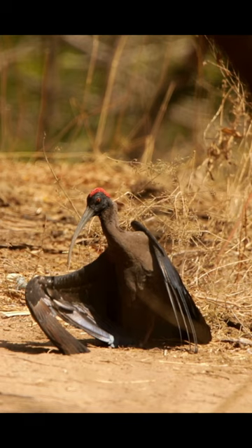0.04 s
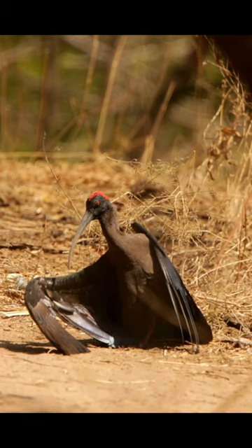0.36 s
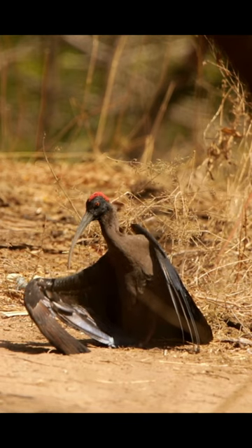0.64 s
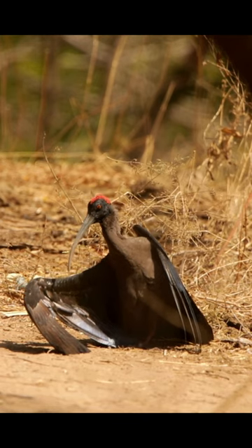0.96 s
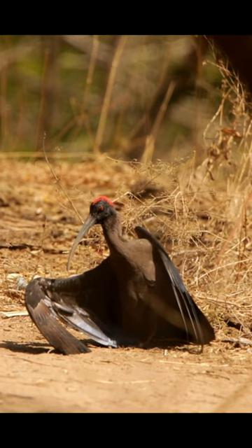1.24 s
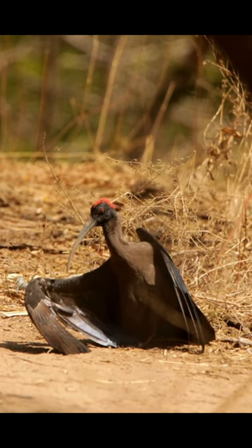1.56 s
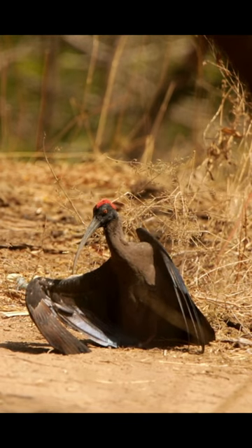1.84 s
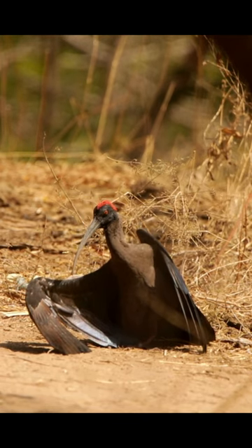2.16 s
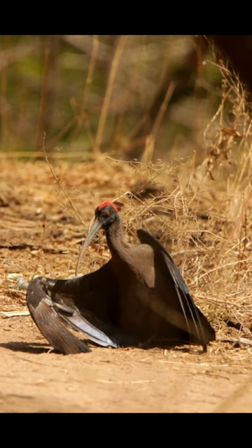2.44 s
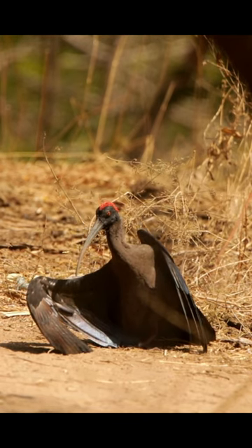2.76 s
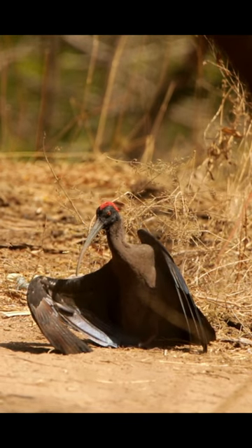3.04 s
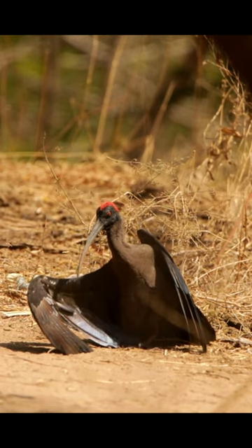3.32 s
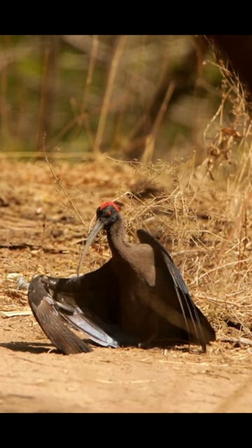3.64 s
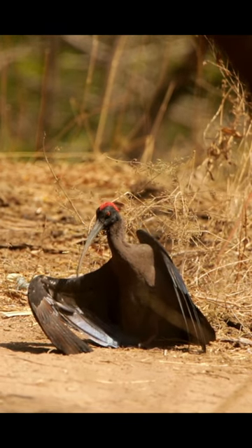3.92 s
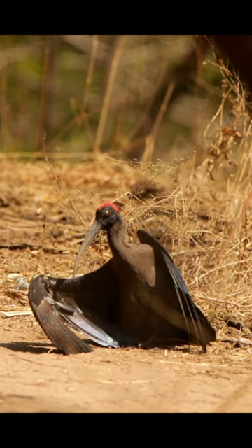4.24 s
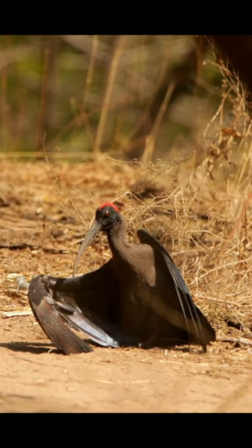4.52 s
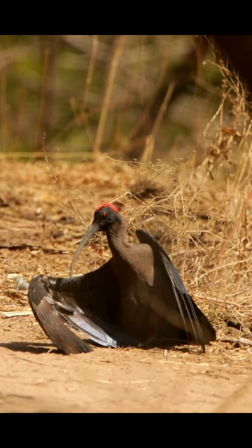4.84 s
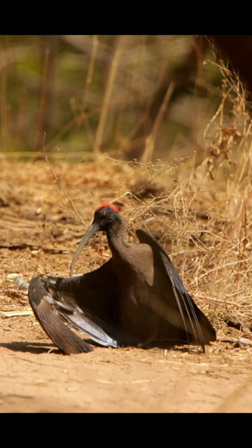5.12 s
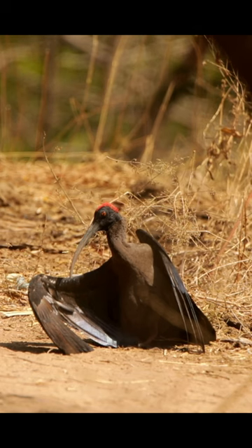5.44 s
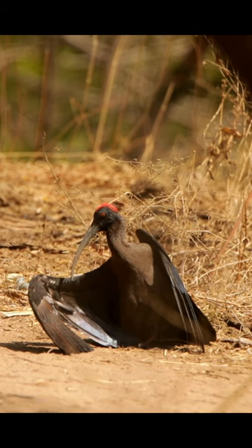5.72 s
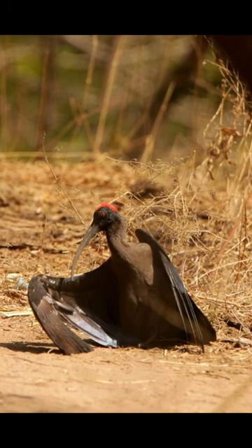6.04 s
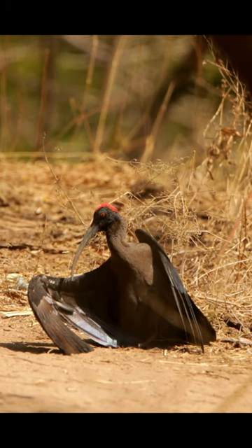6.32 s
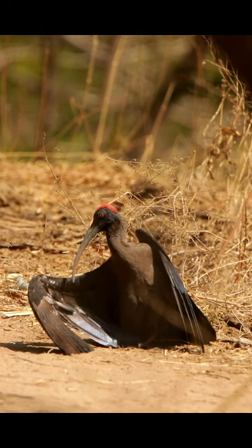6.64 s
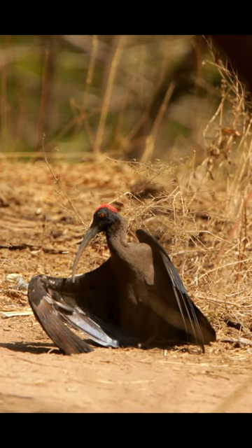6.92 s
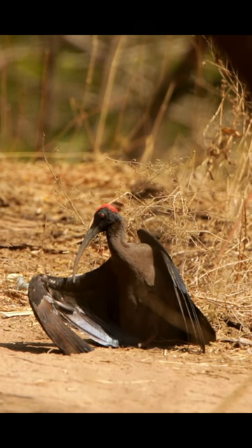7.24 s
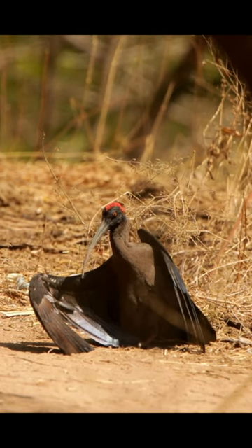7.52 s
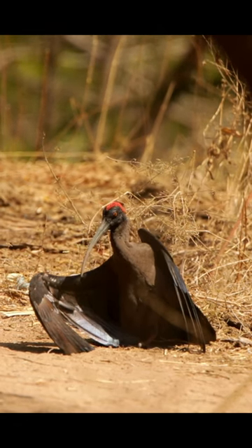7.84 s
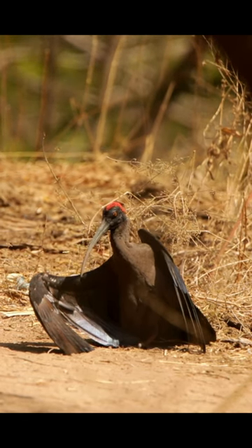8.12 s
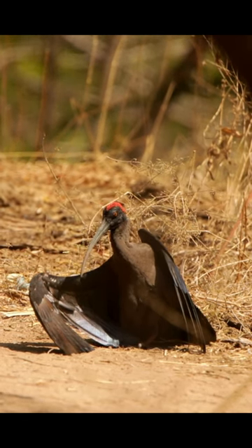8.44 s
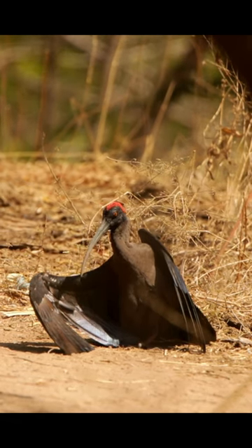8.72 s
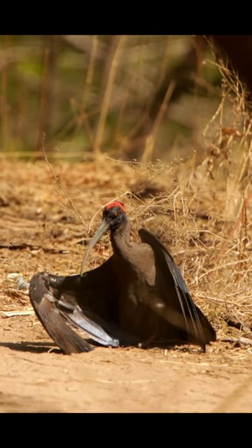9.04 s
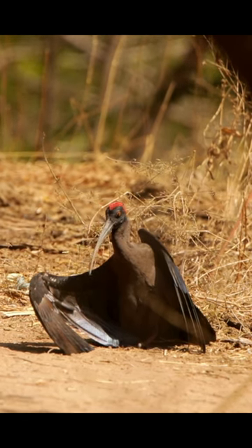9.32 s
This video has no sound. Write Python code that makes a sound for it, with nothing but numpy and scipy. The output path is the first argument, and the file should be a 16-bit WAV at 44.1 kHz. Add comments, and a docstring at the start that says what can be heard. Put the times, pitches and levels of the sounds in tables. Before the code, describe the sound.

Repeated harsh, trilling bird screeches ring out in dry scrub, with small whistles, a few ticks and a steady low background rush.

```python
"""A low outdoor rush opens, and at once birds screech and croak in dry scrub: two-voiced syrinx tones
shaken by a fast trill whose every second dip is deeper. Small birds add whistles throughout and thin
chips for the first 3 s; stalks and trees scatter every call. Two dull knocks land near 1.5 and 2 s,
and air puffs on the microphone from 2 to 5 s. The loudest screech cuts through just after 7 s,
dry grass snaps twice around 8 s, and a faint, rough croak closes the scene."""
import sys
import numpy as np
from scipy import signal
from scipy.fft import rfft, irfft, next_fast_len
from scipy.io import wavfile
from scipy.ndimage import uniform_filter1d, map_coordinates

SR = 44100
rng = np.random.default_rng(int(sys.argv[2]) if len(sys.argv) > 2 else 0)


def put_to_file(sound):
    """Save the sound as 16-bit audio at rate SR, in the file named by the first command-line argument."""
    columns = np.atleast_2d(sound).T  # one column per channel
    safe = np.clip(columns, -1, 1)
    whole_steps = np.round(safe * 32767)
    wavfile.write(sys.argv[1], SR, whole_steps.astype(np.int16))


N = 417627

# Screech cues: (time [s], length [s], attack [s], release [s], relative level [dB], lower voice [dB],
# overtones [dB], time to top pitch [s], top pitch [Hz], end pitch [Hz], trill swing [share],
# crest accent [dB], deep-dip accent [dB], roughness [0-1], pan to the left [dB])
SCREECHES = [ (0.212, 0.18, 0.081, 0.07, -39, -6.5, -12, 0.048, 4420, 4190, 0.035, -1, 0, .25, 2.5),
             (.27, .35, 0.074, 0.28, -36.5, -11.5, -19, 0.031, 3807, 2557, .05, -3, 4, .38, -1),
             (.905, 0.43, 0.1, .12, -31, -16, -13, 0.086, 3280, 2500, 0.085, 1.5, 4.5, 0.34, -3.5),
             (1.3, 0.2, 0.06, 0.12, -34, -6.5, -11, .06, 4045, 3770, 0.038, -3, 6, 0.4, 0),
             (1.391, 0.27, .09, 0.19, -33, -14, -19, 0.039, 2937, 2095, 0.064, 1.5, 2, 0.35, -3),
             (1.926, .41, .11, .1, -26, -10, -15, 0.11, 3480, 2740, 0.041, 0.5, 1, 0.31, -2),
             (2.339, 0.29, .1, 0.17, -37, -10, -22, .12, 4110, 3500, 0.11, 0, -4, 0.5, 1),
             (2.406, .33, 0.068, .18, -31, -5.5, -17, 0.081, 2940, 2603, .09, -4.5, 10, 0.21, -2),
             (2.729, 0.29, 0.028, 0.1, -39.5, -7, -9.5, 0.039, 3910, 2847, .11, -5, -2, 0.46, 0),
             (3.269, 0.52, 0.13, 0.14, -44.5, -10, -11, .12, 3310, 2795, .15, 0, 0, 0.92, 5),
             (3.77, 0.23, .1, 0.066, -41.5, -4.5, -14, 0.086, 3010, 2653, 0.17, 2, 0, .9, 2),
             (4.081, 0.29, 0.098, 0.069, -32, -10.5, -14, 0.11, 3516, 3140, 0.063, 2, -18, 0.47, -2),
             (4.3, .31, 0.086, 0.06, -28, -14.5, -15, 0.072, 3400, 2700, 0.084, 1, 1, .42, -3),
             (4.548, 0.43, 0.054, 0.41, -29.5, -8.5, -14, 0.076, 3566, 2590, 0.18, -4, 2, 0.67, -2),
             (4.904, 0.15, .09, .05, -28, -11.5, -15, .08, 4210, 3690, 0.059, 2, -6, 0.33, 1),
             (4.97, 0.24, .05, 0.15, -33.5, -5, -12.5, 0.043, 3804, 2890, .12, -3, 3, 0.67, -3),
             (5.644, 0.32, 0.17, .045, -27, -10.5, -16, 0.13, 3420, 2907, 0.036, 3.5, 2.5, 0.26, -1),
             (6.057, 0.21, 0.065, 0.077, -29.5, -7, -22.5, 0.11, 2903, 2750, 0.081, -.5, 14, 0.25, -1.5),
             (6.19, .42, 0.088, 0.29, -31.5, -9, -15, .1, 3695, 2392, .14, 2, -7, 0.56, -3),
             (6.901, 0.26, .07, 0.046, -36.5, -9, -30, 0.073, 3870, 3650, 0.11, -2, 2, 0.46, 0),
             (7.103, .2, 0.058, 0.12, -22.5, -11, -15.5, .095, 4844, 3780, .12, -3, 6.5, 0.21, 1),
             (7.283, 0.16, .03, .05, -42, 0, -11, 0.033, 3425, 2930, .12, 0, 0, .7, -3),
             (7.401, 0.37, 0.098, 0.13, -30, -20, -13.5, 0.078, 3427, 2660, 0.079, 2, 3, 0.26, -2),
             (7.808, 0.35, 0.047, 0.035, -36, -9, -35, 0.048, 2680, 2410, 0.066, -2, -15, 0.44, -3),
             (8.09, 0.35, 0.12, .04, -26.5, -12, -13.5, .12, 3535, 2800, .04, 4, 5, 0.24, -1),
             (8.507, .25, 0.044, 0.11, -31.5, -6.5, -24, 0.097, 3045, 2595, .08, 0.5, 14.5, 0.14, -1),
             (9.294, 0.2, .13, .03, -43, -17, -28, 0.064, 2690, 2880, 0.17, 4, 0, 0.83, -1), ]
# Tone curves of a screech, all (frequency [Hz], gain [dB])
THROAT_EQ = [(1000, -45), (1500, -5.5), (1850, 1.5), (4600, 2.5), (5600, 4.5), (7500, -22)]  # throat resonance on both voices
BEAK_EQ = [(1500, -40), (3800, -3), (4650, -2), (5250, 6.5), (6300, -0.5), (7300, 0.5), (8500, 1),
           (10300, -9.5), (12500, -25)]  # overtones that the beak lets out
SHRILL_EQ = [(6000, -46), (8000, -34), (9300, -7), (10200, -10), (10700, -12), (11500, -36)]  # resonance that the upper voice's octave sweeps through
NASAL_EQ = [(3900, -4), (4600, -5), (5200, 4.5), (5700, -1), (6300, -7)]  # beak resonance on the sum tone
RASP_EQ = [(3200, 2.5), (4200, 2), (4700, -0.5), (6500, -24)]  # band of rasp above the upper voice
# Whistle cues: (time [s], length [s], start [Hz], middle [Hz], end [Hz], relative level [dB])
WHISTLE_CUES = [ (0.642, 0.11, 3480, 3450, 3520, -37), (.72, 0.061, 3500, 4020, 4300, -37),
                (0.758, 0.044, 3700, 3300, 3150, -30.5), (.826, .03, 2900, 3290, 3730, -26.5),
                (1.765, 0.034, 3300, 4020, 4270, -32), (1.792, 0.037, 3700, 3300, 3100, -28),
                (1.855, 0.042, 2900, 3460, 2650, -25.5), (2.754, 0.023, 3700, 4270, 4380, -32),
                (2.834, 0.043, 3100, 3440, 3070, -29), (3.162, .04, 6430, 6400, 6450, -46),
                (3.466, 0.033, 3350, 3390, 3380, -32), (4.065, .035, 3000, 3050, 2980, -31),
                (5.561, .09, 3800, 3780, 3820, -40), (6.627, 0.03, 3750, 3390, 3250, -28.5),
                (6.691, 0.034, 3000, 3290, 3620, -24.5), (6.718, 0.047, 3100, 2880, 3010, -35),
                (6.79, 0.04, 2700, 2755, 2700, -31.5), (8.89, 0.042, 3340, 3370, 3460, -34), ]
# Thin falling chips: (time [s], start pitch [Hz], relative level [dB])
CHIP_CUES = [ (.056, 12400, -55), (.172, 12300, -55), (.296, 12000, -47), (.314, 10900, -51),
             (.655, 12900, -55), (1.831, 11400, -48), (2.432, 11500, -53), (2.484, 10900, -49),
             (2.538, 12100, -50), (2.557, 10900, -45), (2.663, 12700, -51), (2.674, 8600, -43),
             (2.688, 11700, -47), (2.707, 11300, -46), (2.822, 8600, -48), (2.833, 11900, -45),
             (2.856, 11100, -47), ]
# Dry grass snaps and soft knocks: (time [s], relative level [dB])
SNAP_CUES = [(0.0593, -40), (7.9882, -33), (8.1702, -26)]
KNOCK_CUES = [(1.47, -34), (2.08, -33)]
# Puffs of air on the microphone: (time [s], half length [s], relative level [dB])
PUFF_CUES = [(2.08, 0.043, -48), (2.243, 0.045, -49), (2.39, 0.057, -54), (4.15, 0.054, -59),
             (5.11, .06, -59)]
# Colours of the noise layers: (frequency [Hz], gain [dB])
SNAP_EQ = [(2000, -22), (6000, -3), (9500, 3), (12500, -17), (15000, -25)]
KNOCK_EQ = [(150, -22), (330, -15), (450, 3), (560, -9), (720, 4.5), (1300, -24), (4000, -70)]
SCRUB_EQ = [(2000, 0), (4500, 1), (8000, 9)]
PUFF_EQ = [(12, -20), (25, -8), (48, 0), (75, -18), (130, -60), (600, -120)]
RUSH_EQ = [(22, -47), (38, -13.5), (118, -10.5), (264, -14), (291, -13.5), (384, -10), (620, -4), (758, -1),
           (2070, -7.5), (3260, -5.5), (3600, -9.5), (3990, -9), (5260, -16), (8270, -19.5), (15500, -40)]
# Stereo image of the rush: (frequency [Hz], left-right correlation [-1 to 1])
RUSH_CORRELATION = [(60, 0.964), (130, 1), (290, 0.78), (640, 0.76), (1410, 0.41), (3100, 0.41),
                    (6820, -0.071), (15000, -0.0041)]
# Reverb tail of the trees: (frequency [Hz], time to fall 60 dB [s])
TREE_DECAY = [(500, 1), (3000, 0.82), (6000, 0.51), (11000, 0.083)]


def screech(row, trill_hz=78.65, throat_hz=2520, plunge_hz=950, rasp_ratio=1.24):
    """One harsh call: both sides of the syrinx sound together under one trill."""
    length, attack, release, level_db, lower_db, overtone_db = row[:6]
    top_s, top_hz, end_hz, swing, crest_db, accent_db, rough = row[6:]
    t = np.arange(0, length, 1 / SR)
    n = len(t)
    effort_db, pitch, gape_db = gesture(t, length, attack, release, top_s, top_hz, end_hz)
    past_middle = t / length - .5
    rough = np.clip(rough * (1 - .47 * past_middle), 0, 1)  # the call clears as it goes
    trill = phase(trill_hz * (1 + .012 * wobble(40, n)))
    crest = -np.cos(trill + .6 * wobble(150, n))
    # period doubling: every second dip plunges toward the throat resonance and pops there
    dip = np.cos(trill / 4) ** 24
    bottom_hz = np.clip(throat_hz, pitch - plunge_hz, .95 * pitch)
    pop_db = accent_db + 6 * past_middle
    accent = amp(crest_db * crest + pop_db * dip ** 3 - 10 * dip * (1 - dip) + 1.8 * wobble(170, n))
    upper_hz = (1 - dip) * pitch * (1 + swing * (crest - .5)) + dip * bottom_hz
    lower_hz = 1990 * (pitch / 3100) ** .35
    upper = phase(upper_hz * (1 + .0496 * rough * wobble(900, n)))
    lower = phase(lower_hz * (1 - .08 * np.sin(trill) + .0718 * wobble(900, n)))
    # chaotic flutter of the membranes spreads the tone into a band
    shake = lambda: wobble(1100, n) + .55 * wobble(3400, n)
    flutter = lambda angle: np.sin(angle) * shake() + np.cos(angle) * shake()
    upper_voice = unit((1 - rough) * unit(accent * np.sin(upper)) + (rough + .03) * flutter(upper))
    # the lower voice swells in the trill's shallow troughs and comes forward as effort drops
    lower_voice = unit(np.sin(lower) * amp(1.8 * wobble(245.4, n) - 1.1 * crest - 6.8 * dip))
    blend = np.clip(amp(lower_db - .66 * effort_db), 0, .8)
    body = coloured(np.sqrt(1 - blend ** 2) * upper_voice + blend * lower_voice, THROAT_EQ)
    # the two voices mix into sum tones, with turbulent hiss on top
    sum_tones = np.sin(2 * upper) + np.sin(2 * upper + lower) / 2
    overtones = unit(coloured(sum_tones + 4.6 * rng.standard_normal(n), BEAK_EQ))
    shrill = coloured(np.sin(2 * upper) * (1 + .62 * shake()), SHRILL_EQ)
    nasal = coloured(amp(-12) * np.sin(2 * lower) + amp(-15.5) * np.sin(upper + lower), NASAL_EQ)
    rasp = amp(-10.5) * coloured(unit(flutter(rasp_ratio * upper)), RASP_EQ)
    opening = amp(gape_db) * min(amp(overtone_db + 16.5), 1)
    voice = body + shrill + opening * (nasal + rasp) + amp(overtone_db + gape_db) * overtones
    fade = np.clip(np.minimum(t, length - t) / .015, 0, 1)
    return amp(level_db + effort_db) * fade * voice


def gesture(t, length, attack, release, top_s, top_hz, end_hz, ease=1.44, widest_at=.38):
    """Effort swells and dies; pitch scoops up and glides to its end; the beak opens and closes once."""
    ramp = lambda x: np.clip(x, 0, 1)
    effort_db = -9 * ramp(1 - t / attack) ** ease - 9.5 * ramp(1 - (length - t) / release) ** ease
    scoop_hz = top_hz * (1 - .12 * ramp(1 - t / top_s) ** 2)
    glide_hz = (end_hz - top_hz) * ramp((t - top_s) / (length - top_s)) ** 1.15
    gape_db = -4.5 * (2 * (t / length - widest_at)) ** 2
    return effort_db, scoop_hz + glide_hz, gape_db


def screeching_birds(right_lead_s=32e-6):
    """Each call is panned to its own place and reaches the right side first; reflections follow."""
    direct, reflected = np.zeros((2, N)), np.zeros((2, N))
    for start, *row, pan_db in SCREECHES:
        # rougher calls come from deeper in the scrub: less direct sound, more reflection
        rough = row[-1]
        call = amp(-2.5 * rough) * screech(row)
        wet = amp(10 * rough) * (amp(-12.5) * scrub(call) + amp(-12) * trees(call))
        for side, sign in enumerate((1, -1)):
            add(direct[side], start, amp(sign * pan_db / 2) * call)
            add(reflected[side], start, wet[side])
    lead_s = right_lead_s / 2 * np.array([[-1], [1]])
    return filtered(direct, lambda hz: np.exp(2j * np.pi * hz * lead_s)) + reflected


def whistles():
    """Small birds further off whistle gliding, slightly hoarse notes."""
    out = np.zeros(N)
    for start, length, *pitches, db in WHISTLE_CUES:
        u = np.linspace(0, 1, round(length * SR))
        glide_hz = np.polyval(np.polyfit([0, .5, 1], pitches, 2), u)
        tone = np.sin(phase(glide_hz * (1 + .01 * wobble(660, len(u)))))
        hoarse = 1 + .45 * wobble(1600, len(u))
        add(out, start, amp(db) * np.abs(np.sin(np.pi * u)) ** .5 * hoarse * tone)
    return out


def chips(length_s=.014, drop=.13):
    """Small birds give thin notes that plunge and hook up at the end."""
    out, u = np.zeros(N), np.linspace(0, 1, round(length_s * SR))
    for start, start_hz, db in CHIP_CUES:
        plunge_hz = start_hz * (1 - drop * (1 - (1 - u / .85) ** 2))
        tone = np.sin(phase(plunge_hz * (1 + .011 * wobble(1560, len(u)))))
        add(out, start, amp(db) * np.sin(np.pi * u) * tone)
    return out


def ground(snap_t60_s=.011, knock_t60_s=.15):
    """Dry stalks snap in bright bursts; something knocks with a dull, rounded attack."""
    out, t = np.zeros(N), np.arange(SR // 4) / SR
    for start, db in SNAP_CUES:
        snap = unit(coloured(rng.standard_normal(len(t)), SNAP_EQ))
        add(out, start, amp(db - 4) * snap * amp(-60 * t / snap_t60_s))
    knock_envelope = (1 - np.exp(-t / .0069)) * amp(-60 * t / knock_t60_s)
    for time, db in KNOCK_CUES:
        knock = unit(coloured(rng.standard_normal(len(t)), KNOCK_EQ))
        add(out, time - .015, amp(db) * knock * knock_envelope)
    return out


def scrub(x, t60_s=.055):
    """Ground and nearby stalks throw back a short, bright spray of reflections."""
    t = np.arange(SR * 3 // 4) / SR
    spray = rng.standard_normal((2, len(t))) * amp(-60 * t / t60_s)
    spray = coloured(spray / np.linalg.norm(spray[0]), SCRUB_EQ)
    return signal.fftconvolve(x[None], spray, axes=1)


def trees(x, onset_s=.0037):
    """Trunks and foliage scatter a call into a darkening tail, different on each side."""
    n = SR * 3 // 4
    hz, t, noise = signal.stft(rng.standard_normal((2, n)), SR, nperseg=256)
    envelope = amp(-60 * t / along(TREE_DECAY, hz)[:, None]) * (1 - np.exp(-t / onset_s))
    tail = signal.istft(noise * envelope, SR, nperseg=256)[1]
    return signal.fftconvolve(x[None], tail[:, :n] / np.linalg.norm(tail[0]), axes=1)


def outdoor_rush(ripple_db=.96):
    """A steady bed of distant, faintly rippling noise: centred in the bass, wide in the treble."""
    noise = signal.stft(rng.standard_normal((2, N)), nperseg=512)[2]
    ripple = uniform_filter1d(rng.standard_normal(noise.shape[1:]), size=6, axis=0)
    ripple = uniform_filter1d(ripple, size=16, axis=1)
    pair = signal.istft(noise * amp(ripple_db * unit(ripple)), nperseg=512)[1][:, :N]
    width = lambda hz: np.arccos(along(RUSH_CORRELATION, hz)) / 2
    split = lambda hz: np.array([np.cos(width(hz)), np.sin(width(hz))])
    mid, side = filtered(pair, lambda hz: amp(along(RUSH_EQ, hz)) * split(hz))
    return unit(np.array([mid + side, mid - side])) * amp([[-40], [-38]])


def air_puffs():
    """Puffs of air buffet the microphone with sub-bass, mostly on the right."""
    t = np.arange(N) / SR
    swells = sum(amp(db) * np.exp(-((t - time) / width) ** 2) for time, width, db in PUFF_CUES)
    rumble = unit(coloured(rng.standard_normal(N), PUFF_EQ))
    return swells * rumble * amp([[-5], [3]])


def amp(db):
    """Decibels to gain."""
    return 10 ** (np.asarray(db) / 20)


def unit(x):
    """Scale to rms 1."""
    return x / np.sqrt(np.mean(x ** 2) + 1e-20)


def along(points, hz):
    """Read a curve on a log frequency axis."""
    freqs, values = np.transpose(points)
    return np.interp(np.log(hz + 1), np.log(freqs + 1), values)


def wobble(rate, size):
    """Smooth random modulation, rate knots a second."""
    knots = rng.standard_normal(int(size * rate / SR) + 4)
    return map_coordinates(knots, [np.arange(size) * rate / SR])


def filtered(x, response):
    """Apply a frequency response."""
    n = x.shape[-1]
    padded = next_fast_len(n + 8192)
    return irfft(rfft(x, padded) * response(np.fft.rfftfreq(padded, 1 / SR)), padded)[..., :n]


def coloured(x, eq):
    """Apply an EQ curve."""
    return filtered(x, lambda hz: amp(along(eq, hz)))


def phase(hz):
    """Running phase of a moving frequency."""
    return 2 * np.pi * np.cumsum(hz) / SR


def add(track, start_s, sound):
    """Mix a sound into the track at its cue."""
    part = track[max(round(start_s * SR), 0):][:len(sound)]
    part += sound[:len(part)]


def scene():
    """Harsh callers in front, small birds deeper in the trees, over the outdoor rush."""
    callers = amp(-1) * screeching_birds()
    small_birds = chips() + amp(-4) * whistles()
    scattered = amp(-6.5) * scrub(small_birds) + amp(-5) * trees(small_birds)
    details = (small_birds + ground()) * amp([[-1.6], [0]])  # a little to the right
    return callers + details + scattered[:, :N] + outdoor_rush() + air_puffs()


def record(dry, cutoff_hz=15800):
    """A brick-wall low-pass trims the very top."""
    return filtered(dry, lambda hz: hz < cutoff_hz)


dry = scene()
out = record(dry)
put_to_file(out)
```